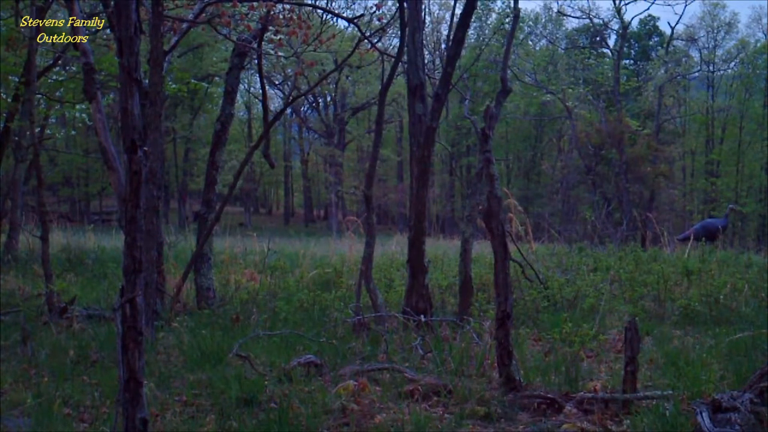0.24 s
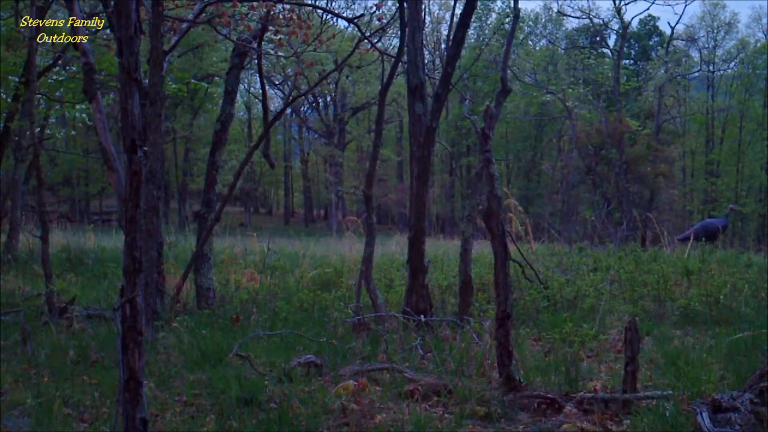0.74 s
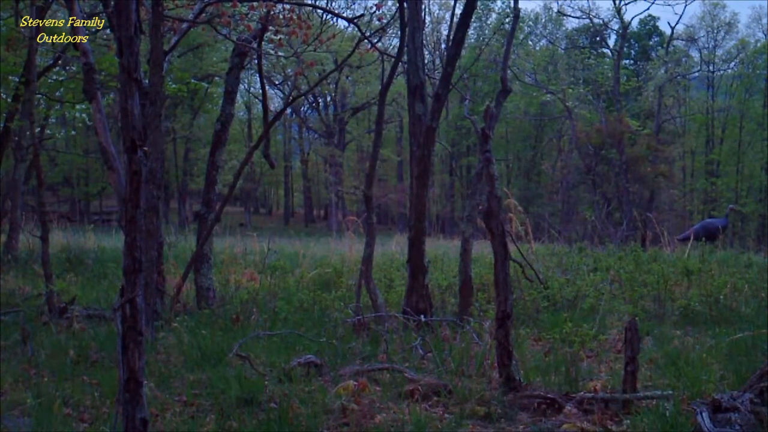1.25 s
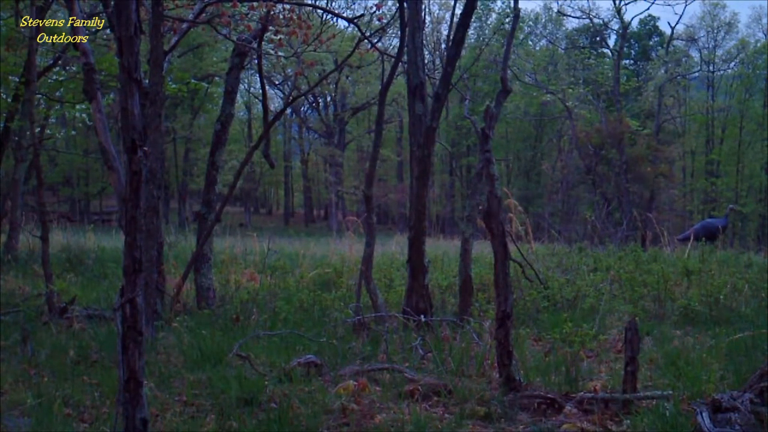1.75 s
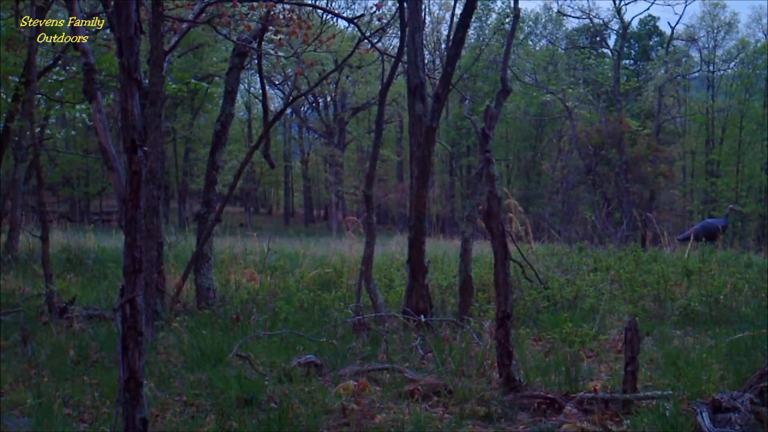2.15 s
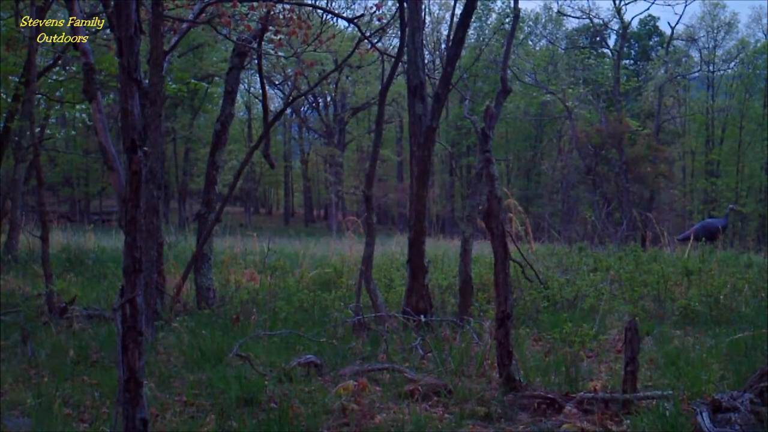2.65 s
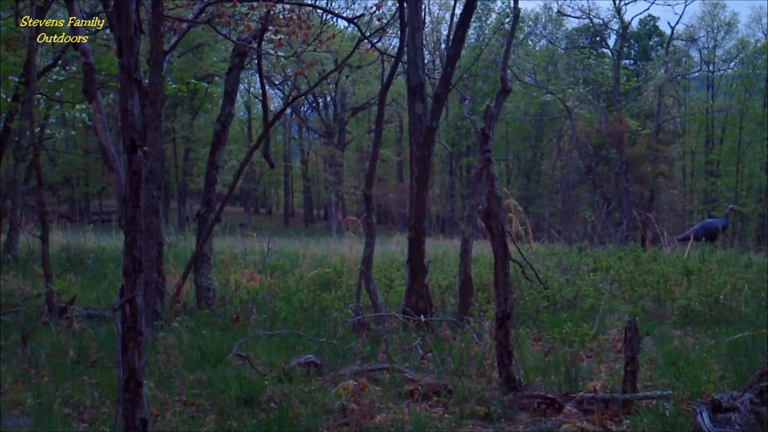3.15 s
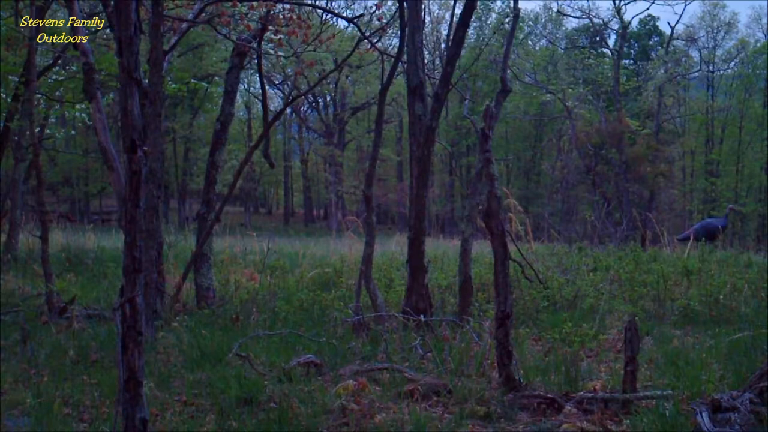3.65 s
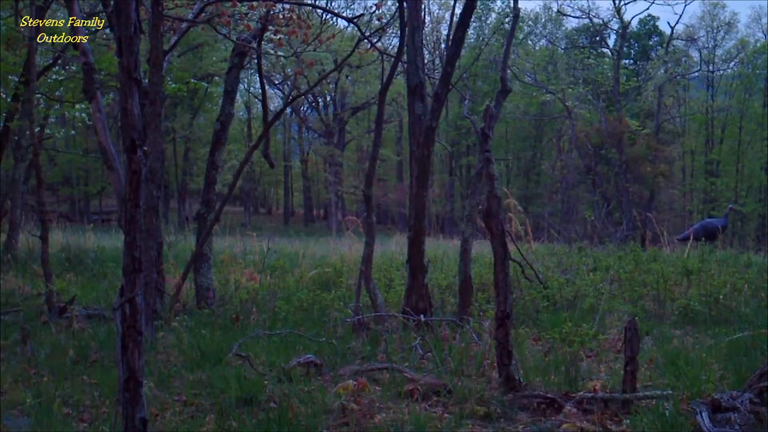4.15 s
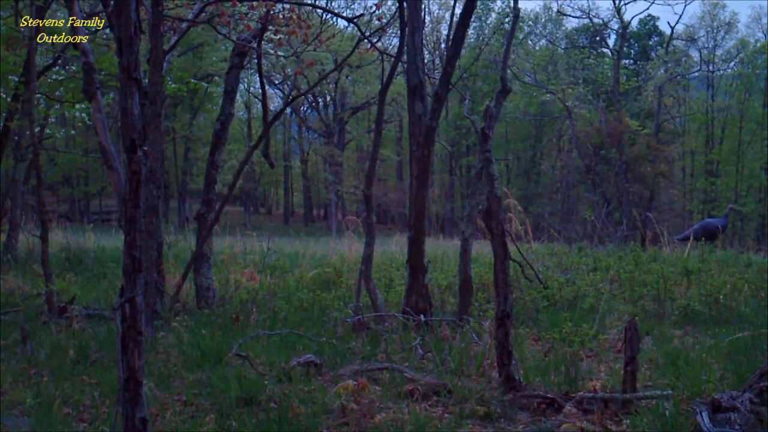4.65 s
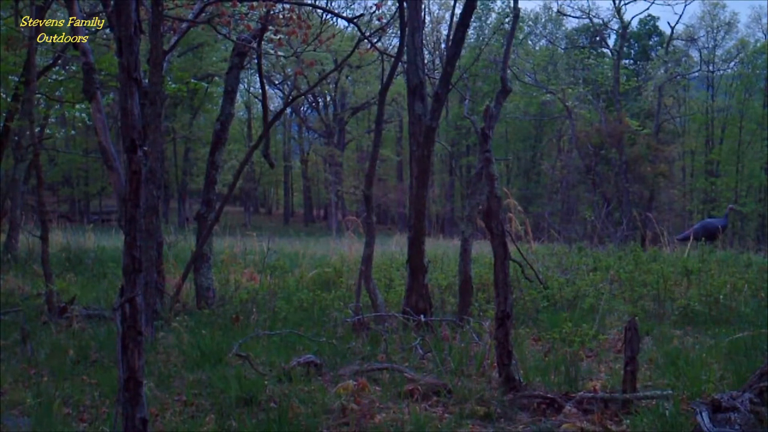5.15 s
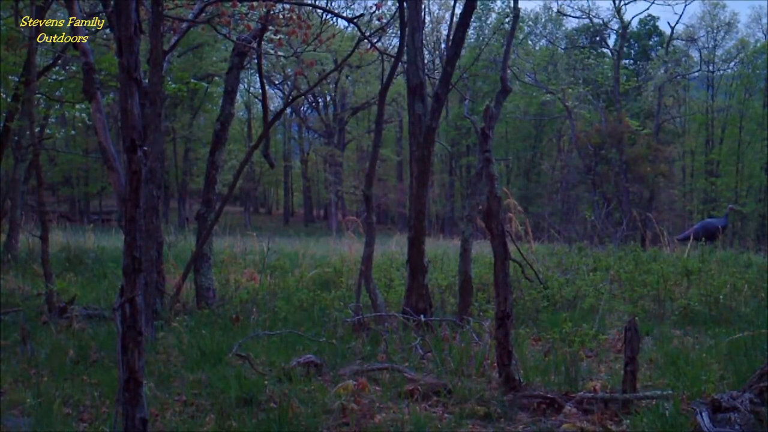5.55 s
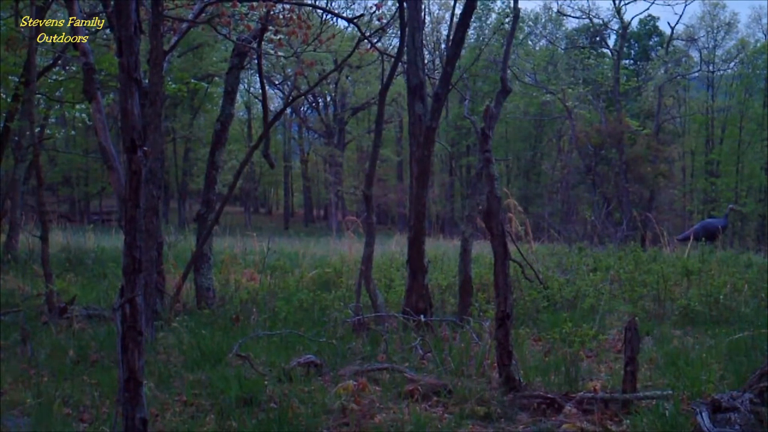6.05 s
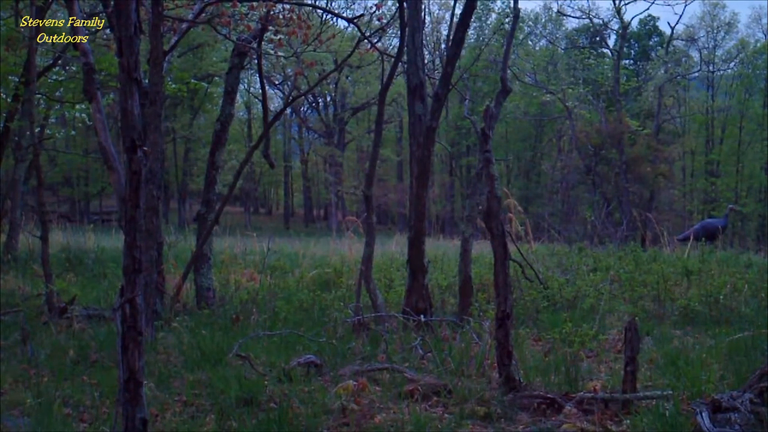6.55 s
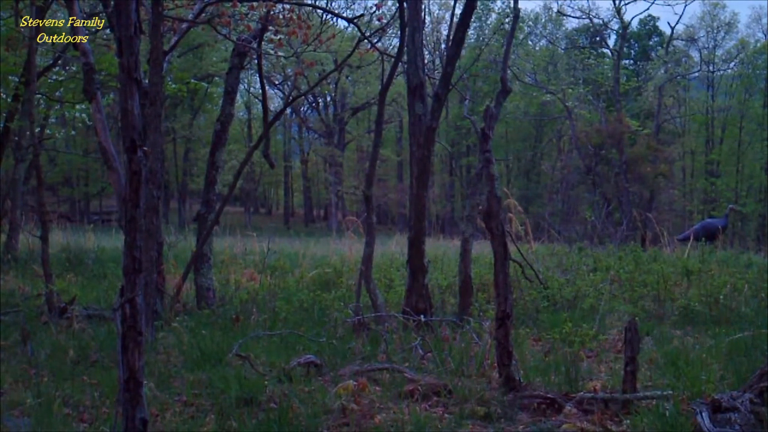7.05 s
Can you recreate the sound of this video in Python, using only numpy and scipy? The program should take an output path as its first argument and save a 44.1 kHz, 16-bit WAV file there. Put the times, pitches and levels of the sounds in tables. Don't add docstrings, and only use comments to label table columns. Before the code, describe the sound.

Mostly near-silence outdoors, picked up by a hissy camera microphone with a faint whine and low hum. Small birds sing thinly at first, thin out to isolated chips and drooping sighs, then gather again. A soft knock and scuff come midway. After a sudden cut to higher gain, a long whistle leads into a fast, throaty turkey gobble with woodland echo, over late low traffic drone.

```python
import sys
import numpy as np
from scipy import signal
from scipy.fft import rfft, irfft
from scipy.io import wavfile
from scipy.ndimage import uniform_filter1d

SR = 44100
rng = np.random.default_rng(int(sys.argv[2]) if len(sys.argv) > 2 else 0)


def output_pcm(signal):
    pcm = np.clip(np.atleast_2d(signal).T, -1, 1) * 32767
    wavfile.write(sys.argv[1], SR, np.round(pcm).astype(np.int16))


def elevation(decibels):
    levels = np.asarray(decibels, float)
    return 10 ** (levels / 20)


N = 322371

CUT_S, CUT_GAIN_DB = 5.846, 9.5
WAVER_HZ = 28


def gobble():
    # start_s, length_s, effort_db, top_pitch_hz, chest_db
    arches = [
        (6.249, 0.04, -30.5, 583, -15.5),
        (6.314, 0.058, -36.5, 687, 1.5),
        (6.415, .055, -29.5, 662, -14),
        (6.446, 0.067, -31.5, 569.6, -6),
    ]
    # start_s, length_s, effort_db, top_pitch_hz, chest_db
    rattle = [(6.517, 0.061, -40, 506.2, 0), (6.599, 0.059, -37.5, 501, -5),
              (6.651, 0.048, -40.5, 483.6, -2), (6.682, 0.066, -34, 486, -7.5),
              (6.746, 0.073, -39.5, 481.6, -12), (6.798, 0.052, -34, 470.6, -7),
              (6.841, 0.068, -35, 562.3, -6), (6.884, 0.072, -35.5, 682.5, -2),
              (6.943, 0.08, -41.5, 688, 5), (7.051, 0.075, -36, 636.4, -2), (7.101, .07, -37.5, 690, 2.5),
              (7.174, 0.046, -42.5, 620, -1), (7.213, 0.038, -39.5, 603, 2.5),
              (7.237, 0.091, -42, 641.5, -7)]
    out = np.zeros(N)
    for row in arches:
        add(out, *syllable(*row, arch=1))
    for row in rattle:
        add(out, *syllable(*row, arch=.75))
    return out


def syllable(start_s, length_s, top_db, top_hz, chest_db, arch):
    # freq_hz, level_db
    throat = [(300, -43), (500, -20.5), (650, -15.5), (800, -6), (1000, -1.5), (1400, -2), (1600, -6.5),
              (2600, -2.5), (2900, -0.5), (3600, 0.5), (4000, -18.5), (5200, -19.5), (7000, -34)]
    # time_s, resonance_hz, beak_db
    mouth = [(6.245, 1620, -14), (6.29, 1840, -12), (6.37, 2090, -3), (6.43, 2090, -19), (6.51, 1740, -4),
             (6.559, 2200, 4.5), (6.85, 1790, -8), (7.0, 2150, 5.5), (7.08, 2090, -1.5)]
    # time_s, half_pitch_share (0-1), roughness (0-1)
    breakup = [(6.25, .01, .08), (6.38, .05, .2), (6.44, .35, .32), (6.5, .4, .32), (6.7, .38, .29),
               (6.9, .38, .23), (7.31, .48, .29)]
    climb_s, rest_hz, least_climb, sag_hz_per_s = .03, 510, .12, 3900
    swell_db, fade_db_per_s, chest_db_per_s = 10, 103, 153

    age_s = np.arange(0, length_s, 1 / SR)
    time_s = start_s + age_s
    count = len(age_s)
    to_climb = smooth_ramp(1 - age_s / climb_s)
    past_s = smooth_ramp(age_s - climb_s)

    effort_db = top_db - swell_db * to_climb - fade_db_per_s * past_s
    chest_db = chest_db + chest_db_per_s * past_s

    climb_hz = max(top_hz - rest_hz, least_climb * top_hz)
    hz = top_hz - arch * (climb_hz * to_climb + arch * sag_hz_per_s * past_s)
    hz = hz * (1 - .05 * (1 - np.hanning(count) ** .5))

    mouth_hz, beak_db = curves(mouth, time_s)
    half_share, rough = curves(breakup, time_s)
    turns = np.cumsum(hz * (1 + .05 * rough * wobble(count, 150))) / SR

    out = np.zeros(count)
    for k in np.arange(1, 23) / 2:
        f = k * hz
        tilt_db = chest_db * np.clip((1500 - f) / 150, 0, 1)
        tilt_db = tilt_db + beak_db * np.clip((f - 2600) / 300, 0, 1)
        tilt_db = tilt_db + 9.05 * np.exp(-((f - mouth_hz) / 400) ** 2)
        airy = np.clip(rough + (f - 2400) / 1600 * (f > 2400), 0, .7)
        flutter = 1 - airy + airy * wobble(count, 60 + 15 * k)
        gain = elevation(read(throat, f) + tilt_db) * (half_share if k % 1 else 1)
        out += gain * flutter * np.cos(2 * np.pi * (k * turns + rng.random()))
    return start_s, elevation(effort_db - 1.5) * out * signal.windows.tukey(count, .6)


def neck_tones():
    # start_s, length_s, pitch_hz, sweep_hz, level_db
    tones = [
        (6.356, .07, 1323, 60, -45),
        (6.91, 0.0276, 1333, -48, -37.5),
        (6.948, 0.039, 1355, 13, -39),
    ]
    out = np.zeros(N)
    for row in tones:
        add(out, *slur(*row))
    return out


def songbirds():
    out = np.zeros(N)
    held_whistles(out)
    slurs_and_sighs(out)
    chips_and_trills(out)
    repeated_phrases(out)
    return out


def held_whistles(out):
    # start_s, length_s, pitch_hz, level_db, fade_db
    whistles = [
        (2.138, 0.26, 4420, -71, 3),
        (2.5, 0.25, 2680, -75, 3),
        (4.585, 0.184, 5110, -65.5, 2),
        (6.14, 0.5, 3686, -50.5, 11),
    ]
    # length_s, pitch_hz, level_db, fade_db
    caught = [
        (.11, 5160, -54, 14),
        (.3, 3730, -50, 8),
    ]
    for row in whistles:
        add(out, *held(*row))
    for row in caught:
        add(out, *held(CUT_S, *row, fresh=0))


def slurs_and_sighs(out):
    # start_s, length_s, middle_hz, sweep_hz, level_db
    early = [(0, 0.027, 4760, 64, -70), (.031, 0.063, 3700, -23, -69), (0.038, .2, 3190, -53, -72),
             (.195, 0.036, 3750, 98, -69), (0.312, 0.086, 4440, 250, -71), (0.343, 0.027, 3400, 0, -72),
             (0.361, 0.13, 3110, 0, -72.5), (.46, 0.14, 4300, 254, -75), (0.495, .083, 3740, 100, -69),
             (0.516, .1, 3250, 0, -76), (0.531, 0.16, 3120, 0, -79), (0.637, 0.09, 4800, 50, -75),
             (.647, 0.027, 3620, 0, -70), (.66, 0.065, 4280, 0, -74), (0.686, 0.013, 3670, 0, -69),
             (.79, .09, 4700, 200, -76), (0.808, 0.075, 4130, 0, -71), (.82, 0.081, 3550, 0, -79)]
    # start_s, length_s, middle_hz, sweep_hz, level_db
    late = [(3.998, .05, 2300, -100, -76), (4.628, .045, 5880, 100, -70), (4.7, .1, 4650, 100, -73),
            (4.81, .08, 4200, 50, -74), (4.82, .1, 4800, 100, -75), (4.83, .1, 3590, -70, -76),
            (4.922, .05, 3050, -100, -71), (4.95, .066, 2230, -130, -76), (4.96, .092, 3740, 20, -73),
            (4.97, .088, 4320, 100, -73), (5.018, .03, 1990, -160, -72), (5.04, .027, 5000, -300, -67.5),
            (5.055, .012, 5780, 900, -72), (5.088, .12, 4440, -100, -76), (5.219, .08, 4370, -280, -62.5),
            (5.249, .085, 4020, -100, -65), (5.255, .08, 3700, -100, -70), (5.264, .065, 4910, 450, -68),
            (5.283, .04, 4590, -50, -64), (5.64, .03, 5950, -460, -65), (6.13, .12, 2130, -320, -67),
            (6.39, .05, 4450, -50, -55), (6.42, .05, 4100, -300, -57), (6.455, .045, 4260, -250, -51)]
    sighs_s = [3.412, 3.797]
    # after_s, length_s, middle_hz, sweep_hz, level_db
    sigh = [
        (0, .135, 2690, -120, -65),
        (.135, .07, 2470, -340, -78),
        (.13, .15, 2670, -20, -79),
    ]
    for row in early + late:
        add(out, *slur(*row))
    for start_s in sighs_s:
        for after_s, *shape in sigh:
            add(out, *slur(start_s + after_s, *shape))


def chips_and_trills(out):
    # start_s, length_s, middle_hz, end_bend_hz, level_db
    chips = [
        (0.653, 0.043, 6600, 872, -60),
        (1.11, 0.04, 8160, -550, -68),
        (1.678, .045, 6970, 380, -64),
        (2.342, .047, 7650, 450, -69),
        (5.685, 0.017, 5300, -750, -66),
        (5.8, .02, 5500, -850, -92),
    ]
    # start_s, count, middle_hz, sweep_hz, level_db
    trills = [
        (2.865, 1, 4800, 450, -67),
        (2.9325, 5, 4800, 450, -71),
        (5.387, 7, 4050, -550, -63),
        (5.35, 8, 2950, 650, -71),
        (6.48, 10, 4080, -400, -56),
        (5.43, 3, 4620, -500, -72),
    ]
    period_s, fall_hz_per_s, rise_s = .0675, 23000, .015
    for start_s, length_s, hz, bend_hz, db in chips:
        add(out, *note(start_s, length_s, hz + bend_hz, hz, hz + bend_hz, db))
    for start_s, count, hz, sweep_hz, db in trills:
        length_s = max(-sweep_hz / fall_hz_per_s, rise_s)
        for k in range(count):
            add(out, *slur(start_s + k * period_s, length_s, hz, sweep_hz, db))


def repeated_phrases(out):
    # first_s, length_s, start_hz, middle_hz, end_hz, level_db
    phrase = [
        (.098, .03, 3100, 3330, 3100, -64.5),
        (.098, .1, 1980, 2020, 1620, -75.5),
    ]
    phrase_s, answer_s = .364, .091
    for k in range(4):
        for part, (first_s, *shape) in enumerate(phrase):
            add(out, *note(first_s + k * phrase_s + part * answer_s, *shape))
    riser_s, fade_db = .076, 2
    for k in range(4):
        add(out, *note(.011 + k * riser_s, .038, 3930, 4110, 4220, -64.5 - k * fade_db))


def held(start_s, length_s, hz, db, fade_db, fresh=1):
    onset_s, onset_db, overshoot, droop, flutter_db = .02, 10, .015, .009, 3.5
    age_s = np.arange(0, length_s, 1 / SR)
    done = age_s / length_s
    onset = fresh * np.exp(-age_s / onset_s)
    hz = hz * (1 + overshoot * onset - droop * done)
    hz = hz + WAVER_HZ * (1 - onset) * wobble(len(age_s), 45)
    db = db - onset_db * onset ** 2 - fade_db * done
    db = db + flutter_db * done * wobble(len(age_s), 25)
    return whistle(start_s, hz, db, .1 * fresh + .02)


def slur(start_s, length_s, hz, sweep_hz, db):
    u = np.linspace(-.5, .5, round(length_s * SR))
    return whistle(start_s, hz + sweep_hz * u + WAVER_HZ * wobble(len(u), 45), db, .25)


def note(start_s, length_s, start_hz, middle_hz, end_hz, db):
    u = np.linspace(-1, 1, round(length_s * SR))
    slope_hz = (end_hz - start_hz) / 2
    bend_hz = (start_hz + end_hz) / 2 - middle_hz
    return whistle(start_s, middle_hz + slope_hz * u + bend_hz * u ** 2, db, .15)


def whistle(start_s, hz, db, edge):
    tremble = 1 + .22 * wobble(len(hz), 50)
    tone = np.sqrt(2) * np.sin(2 * np.pi * np.cumsum(hz) / SR)
    return start_s, elevation(db) * tremble * tone * signal.windows.tukey(len(hz), edge)


def knocks():
    # start_s, peak_db, pitch_hz, t60_s
    taps = [
        (4.18, -41, 480, .012),
    ]
    # start_s, length_s, level_db, low_hz, high_hz
    rustles = [
        (4.652, .045, -61.5, 700, 1600),
        (4.645, .06, -68, 1200, 6000),
        (4.065, .04, -68, 6500, 11000),
        (2.63, .18, -73, 3300, 4000),
        (6.41, .11, -54.5, 4000, 6800),
    ]
    out, t = np.zeros(N), np.arange(4000) / SR
    for start_s, db, hz, t60_s in taps:
        rise = np.minimum(t / .0026, 1)
        add(out, start_s, -elevation(db - 60 * t / t60_s) * rise * 2 * np.sin(2 * np.pi * hz * t))
    for start_s, length_s, db, lo_hz, hi_hz in rustles:
        count = round(length_s * SR)
        add(out, start_s, elevation(db) * band(SR // 5, lo_hz, hi_hz)[:count] * np.hanning(count))
    return out


def chorus():
    # time_s, level_db
    swell = [(0.0, -58), (0.83, -62.5), (1.2, -100), (2.2, -118), (2.71, -95), (3.55, -93), (4.55, -66),
             (4.63, -60), (5.84, -60)]
    out = np.zeros(N)
    for when, pitch, length, bend, soft in rng.random((700, 5)):
        hz = 3450 + 1650 * pitch
        middle_hz = hz * (1 + .08 * (bend - .5))
        end_hz = hz * (1 + .2 * (bend - .5))
        add(out, *note(CUT_S * when, .015 + .035 * length, hz, middle_hz, end_hz, -4 * soft))
    return elevation(-10) * level(swell) * evened(out)


def woods(x):
    # freq_hz, t60_s, level_db
    decay = np.array([(300, 1, 1.5), (1070, 1, 11), (1470, 0.69, -1.5), (2550, 0.47, -4),
                      (3850, 0.72, -5.5), (8040, 0.083, -17.5)])
    taps = np.zeros(SR)
    at = np.arange(500, SR - 20, 20)
    taps[at + rng.integers(0, 20, len(at))] = rng.choice([-1., 1.], len(at))
    hz, t, z = signal.stft(taps, SR, nperseg=256)
    z = z * elevation(-60 * t / read(decay[:, :2], hz)[:, None])
    z = z / np.linalg.norm(z, axis=1, keepdims=True)
    z = z * elevation(read(decay[:, ::2], hz))[:, None]
    tail = signal.istft(z, SR, nperseg=256)[1]
    return signal.fftconvolve(x, tail / np.linalg.norm(tail))[:N]


def rumble():
    # time_s, level_db
    swell = [(5.85, -70), (6.0, -70), (6.7, -52.5), (6.9, -57), (7.24, -49.5), (7.31, -48.5)]
    return elevation(-6) * level(swell) * band(N, 61, 113)


def road():
    # time_s, level_db
    wash = [(0.0, -71.5), (1.2, -75.5), (2.88, -71), (3.37, -77.5), (5.32, -72.5), (5.84, -74.5),
            (7.31, -70)]
    return elevation(1) * level(wash) * band(N, 367, 946)


def hiss():
    # freq_hz, density_db_per_hz
    density = [(20, -94.5), (45, -92.5), (70, -90.5), (120, -95.5), (250, -101), (600, -104), (1000, -102),
               (1350, -104), (2500, -105), (4500, -106), (7000, -108), (11000, -110), (16000, -111)]
    colour = elevation(read(density, np.fft.rfftfreq(N, 1 / SR))) * np.sqrt(SR / 2)
    return irfft(rfft(rng.standard_normal(N)) * colour, N)


def camera():
    line_hz, field_s, hum_hz = 15734.27, 1 / 60.054, 29.87
    first_flip_s, skipped_s = .01272, .00166
    t = np.arange(N) / SR
    t = t + skipped_s * (t > CUT_S)
    field = (t - first_flip_s) / field_s
    flip = np.tanh(40 * np.sin(np.pi * field))
    half_line = elevation(-61) * flip * np.sqrt(2) * np.sin(np.pi * line_hz * t)
    line = elevation(-76) * (1 + .5 * np.exp(-(field % 1) / .12)) * np.sin(2 * np.pi * line_hz * t)
    whine = elevation(-76) * np.sin(2 * np.pi * np.cumsum(14488 + 16 * wobble(N, 8)) / SR)
    hum = elevation(-68) * np.sin(2 * np.pi * hum_hz * t + 2.94)
    return half_line + line + whine + hum


def starved(x):
    # time_s, depth_db, lowest_hz
    dropouts = [(.661, 12, 1200), (1.197, 16, 1500), (1.661, 14, 1200), (1.778, 12, 800), (2.317, 3, 3000),
                (5.608, 16, 300), (5.656, 16, 1000), (5.98, 8, 1500), (6.236, 14, 2000), (6.7, 18, 3900),
                (7.211, 14, 3700)]
    hz, t, z = signal.stft(x, SR, nperseg=512, noverlap=384)
    lost = np.repeat(rng.random((len(dropouts), 65)) > .2, 4, axis=1)[:, :len(hz)]
    lost = lost | (hz > 6000)
    loss_db = np.zeros(z.shape)
    for (time_s, db, lo_hz), gone in zip(dropouts, lost):
        loss_db += db * np.outer(gone * (hz > lo_hz), np.exp(-((t - time_s) / .012) ** 4))
    return signal.istft(z * elevation(-loss_db), SR, nperseg=512, noverlap=384)[1][:N]


def evened(x):
    return x / np.sqrt(np.mean(x ** 2) + 1e-20)


def read(points, hz):
    f, value = np.transpose(points)
    return np.interp(np.log(hz + 1), np.log(f + 1), value)


def curves(rows, time_s):
    when_s, *columns = np.transpose(rows)
    return [np.interp(time_s, when_s, column) for column in columns]


def level(rows):
    return elevation(np.interp(np.arange(N) / SR, *np.transpose(rows), left=-120, right=-120))


def smooth_ramp(x):
    return uniform_filter1d(np.maximum(x, 0), size=620, mode="nearest")


def wobble(count, hz):
    noise = rng.standard_normal(count + 2000)
    return evened(signal.lfilter(*signal.butter(2, hz, fs=SR), noise)[2000:])


def band(count, lo_hz, hi_hz):
    sos = signal.butter(2, [lo_hz, hi_hz], "band", fs=SR, output="sos")
    return evened(signal.sosfilt(sos, rng.standard_normal(count)))


def add(mix, start_s, sound):
    part = mix[round(start_s * SR):][:len(sound)]
    part += sound[:len(part)]


def scene():
    turkey, neck, birds, far = gobble(), neck_tones(), songbirds(), chorus()
    after = np.arange(N) / SR > CUT_S
    gain = elevation(CUT_GAIN_DB * after)
    early_echo = woods((elevation(-4.5) * birds + far) * ~after) * ~after
    late_echo = woods((elevation(.5) * birds + elevation(-8) * turkey + elevation(-12) * neck) * after)
    faint = starved(early_echo + late_echo + rumble() + gain * (hiss() + road()))
    return np.tile(turkey + neck + birds + knocks() + faint + gain * camera(), (2, 1))


def band_limit(x):
    return signal.sosfilt(signal.butter(12, 16250, fs=SR, output="sos"), x)


def record(dry):
    lowpass = signal.firwin(1023, 15790, window=("kaiser", 9), fs=SR)
    limited = signal.oaconvolve(dry, lowpass[None], "same")
    return band_limit(limited)


dry = scene()
out = record(dry)
output_pcm(out)
```